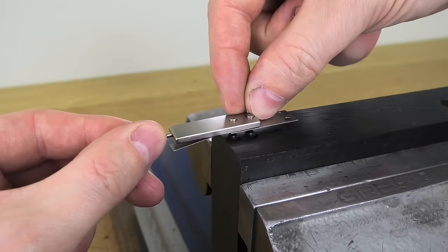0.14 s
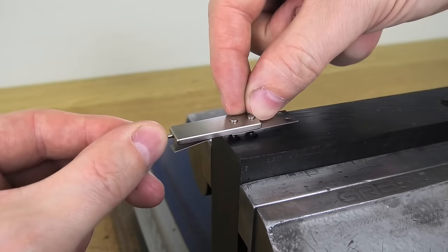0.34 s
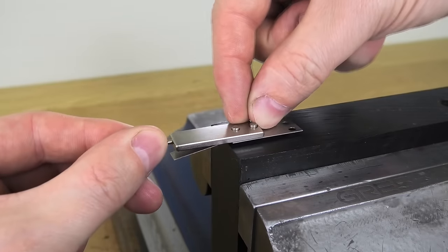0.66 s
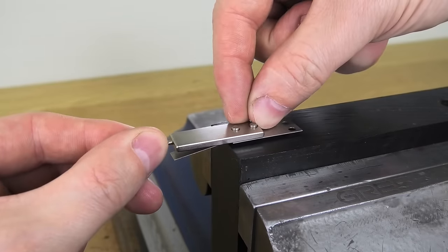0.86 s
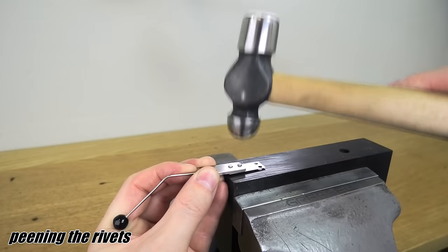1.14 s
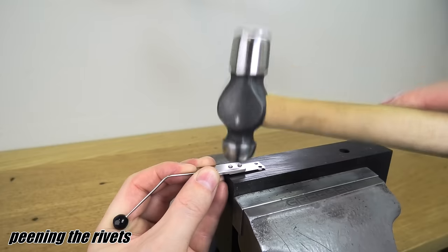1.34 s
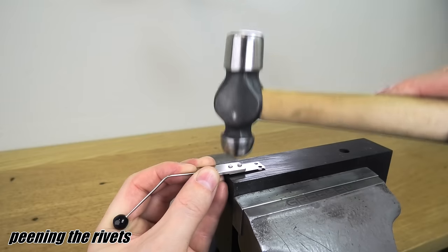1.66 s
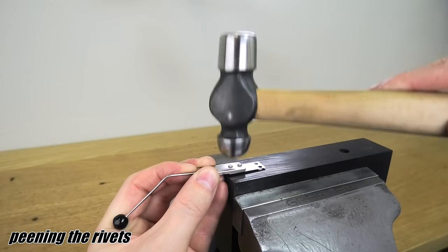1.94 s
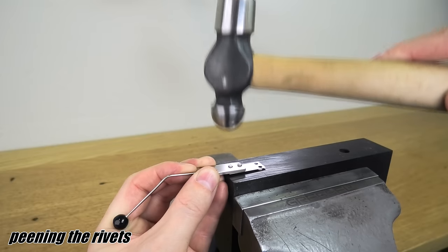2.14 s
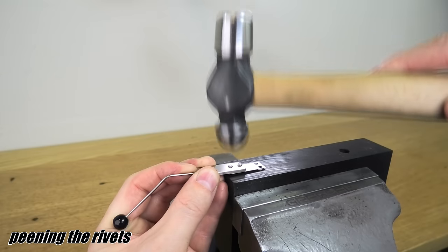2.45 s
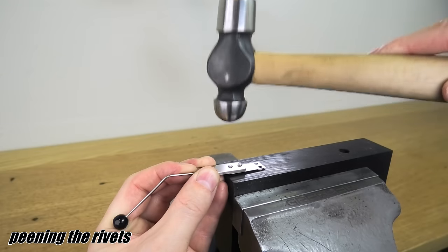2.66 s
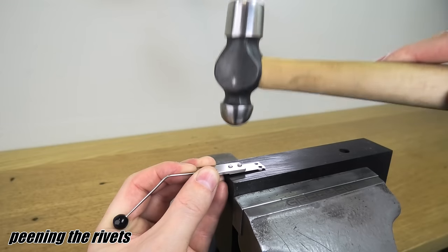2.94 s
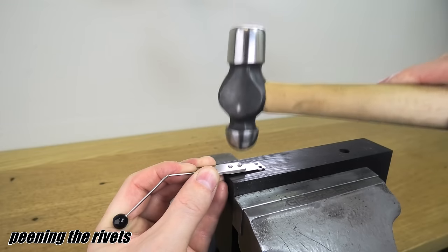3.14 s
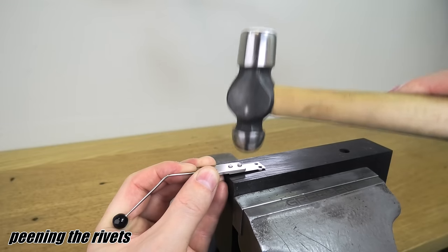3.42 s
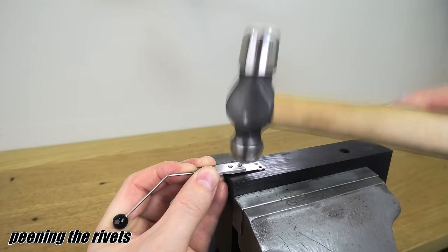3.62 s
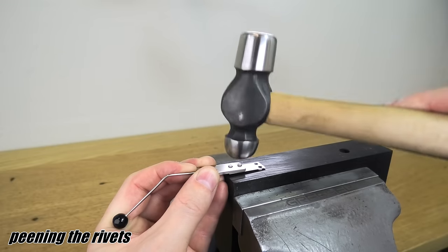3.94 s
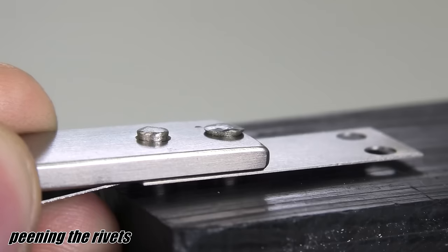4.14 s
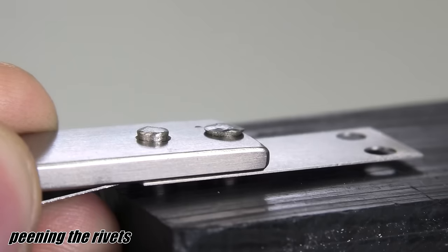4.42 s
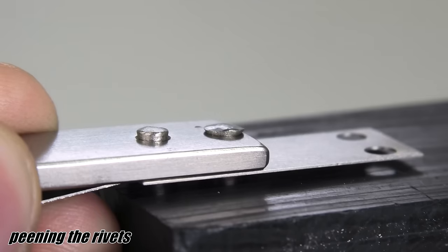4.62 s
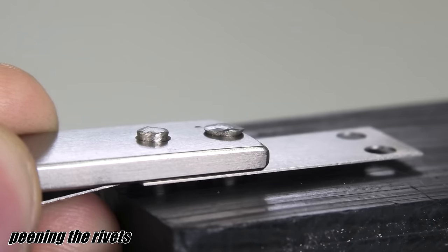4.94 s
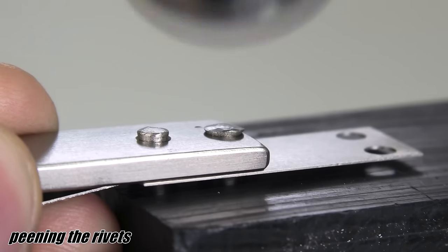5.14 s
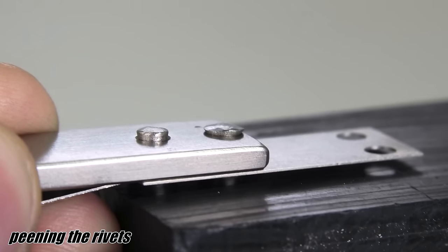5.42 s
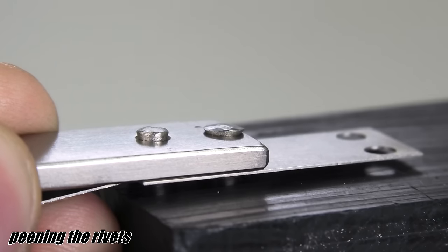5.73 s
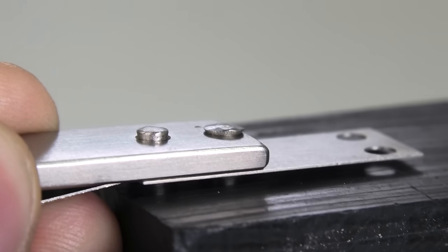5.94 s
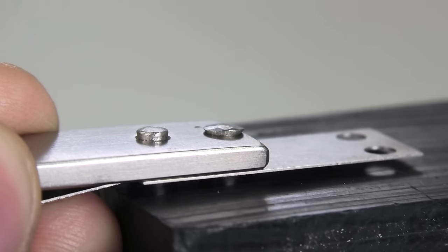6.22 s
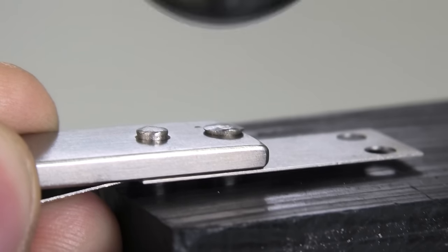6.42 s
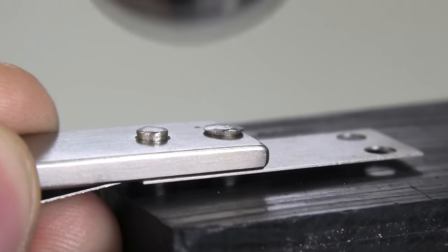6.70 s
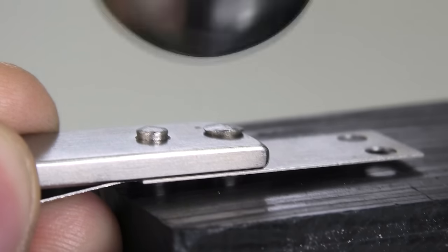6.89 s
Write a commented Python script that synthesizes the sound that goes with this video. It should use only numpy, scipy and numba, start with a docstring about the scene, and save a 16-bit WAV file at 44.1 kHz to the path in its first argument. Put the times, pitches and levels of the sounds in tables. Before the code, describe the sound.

A small hammer taps rivets over a steel vise in a quick, even rhythm, with ringing clanks and a rattling wooden bench.

```python
"""A faint hum and soft air noise fill a small workshop. Fingers snap a thin plate into place.
Then a small ball hammer taps rivets on the steel back of a bench vise, 22 times.
Each blow cracks, rings the hammer and vise, drums the wooden bench and rattles the tools on it.
The walls answer the plate and the bright steel; a limiter ducks loud peaks and recovers.
Midway through the taps the ringing dips briefly, and the later blows have a slightly different tone."""
import sys
import numpy as np
from scipy import signal
from scipy.fft import rfft, irfft, next_fast_len
from scipy.io import wavfile
from scipy.ndimage import map_coordinates
from numba import njit

SR = 44100
rng = np.random.default_rng(int(sys.argv[2]) if len(sys.argv) > 2 else 0)


def wrap_up_sound(samples):
    """Save the sound to the file named by the first command line argument, as 16-bit audio."""
    columns = np.atleast_2d(samples).T
    # keep every value between -1 and 1, then stretch to whole-number steps
    tamed = np.clip(columns, -1, 1)
    steps = np.round(tamed * 32767).astype(np.int16)
    wavfile.write(sys.argv[1], SR, steps)


N = 311346
T = np.arange(SR * 3 // 5) / SR  # the clock of one short sound [s]

# Tones of the hum: (pitch [Hz], average level [dB])
HUM_TONES = [(48.4, -65), (102.3, -66.5), (209.9, -80.5), (366.1, -77.5), (398.4, -83)]
# Colour of the air noise: (frequency [Hz], relative level [dB])
AIR_COLOUR = [(12, -38), (20, -5), (43, -9.5), (101, -1.5), (129, -10), (200, -11), (328, -20.5),
              (365, -14.5), (431, -16.5), (954, -28.5), (5820, -40.5), (7450, -42), (14000, -51)]
# Air noise over time: (time [s], level [dB], extra gain above 1 kHz [dB])
AIR_LEVELS = [(0, -69.5, 3), (.6, -65, -1), (1, -70.5, 4.5), (1.02, -63, -11.5), (7.06, -69.5, 2.5)]
# Plate snaps: (time [s], level [dB], knock level [dB], high ring [Hz], low ring [Hz],
# low ring against high [dB], scrape against snap [dB])
SNAPS = [(0.7034, -17.5, -32.5, 12200, 3970, -17.5, -15), (1.2944, -41.5, -54.5, 5600, 4320, 0, -28),
         (1.686, -51, -64, 4750, 3430, -6, -22)]
# Echo of the walls: (frequency [Hz], fade time [s]). A fade time is how long a 60 dB fall takes.
WALL_FADE = [(200, 1), (1000, 0.25), (4000, 0.25), (13000, 0.085)]
# Ringing tones of each part: (pitch [Hz], relative level [dB], fade time [s])
BENCH_TONES = [(29.24, -20, 0.93), (59.5, -13, 0.56), (91.7, -0.5, 0.31), (107.7, -13.5, 0.63),
               (144.5, -17, 0.7), (171.4, -8.5, 0.36), (201.1, -13, 0.5), (258.2, -5.5, 0.11),
               (281, -11, 0.25), (314, -17.5, 0.59), (354.9, -6, 0.36), (374.8, -1.5, 0.31),
               (392, -12.5, 0.3), (397.3, 1.5, 0.21), (388.7, -20.5, 0.14), (424.6, -12.5, 0.48),
               (471.5, -10.5, 0.12), (462.6, -21.5, 0.92), (508, -12.5, 0.29), (546, -3.5, 0.28),
               (553.7, -10.5, 0.4), (573, -16, 0.076), (611, -18, 0.083), (634, -5, 0.29),
               (664.8, -2, 0.31), (685, 0, 0.25), (694.7, -12.5, 0.24), (704, -6.5, 0.27),
               (735.6, -7, 0.22), (758, -21.5, 0.11)]
CLACK_TONES = [(902, 3.5, 0.019), (1260, -6, 0.058), (1740, -7, 0.0072)]  # the jolt of the vise body
JAW_TONES = [(840, -1, 0.073), (890.5, 4, 0.25), (925, 2, 0.31), (933, -7, 0.25), (1050, -14.5, 0.11),
             (1142, -11.5, 0.15), (1193, -15, 0.35), (1224, 4.5, 0.28), (1270, -14.5, 0.47),
             (1322, -11.5, .4), (1390, -16.5, 0.12), (1475, 3.5, .24), (1570, -12, 0.29),
             (1579, -0.5, 0.21), (1532, 6, 0.25), (1610, -1.5, 0.31), (1550, -10, 0.32), (1782, 0, 0.28),
             (1797, 0, 0.26), (1880, 0.5, 0.28), (1757, -11, 0.23), (1930, -24.5, 0.19),
             (2106, -14.5, 0.083), (2170, -23.5, 0.087), (2517, -8.5, 0.13)]
VISE_TONES = [(3020, -11.5, 0.25), (3067, -12, 0.29), (3093, -14, 0.3), (3160, -12.5, 0.2),
              (3127, 6.5, 0.1), (3226, -7, 0.14), (3580, -28.5, .08), (3990, -1.5, 0.053), (4280, -12, 0.1),
              (4428, -15.5, 0.19), (4445, -19, 0.25), (4906, -12.5, 0.066), (5028, -2, 0.038),
              (5700, -12.5, 0.027)]
HAMMER_TONES = [(12950, 0.5, 0.04), (15900, -14, 0.022), (9400, -17, 0.03), (11800, -12, 0.02),
                (7900, -13, 0.025), (6800, -21.5, 0.021)]
# Bench top panels, each swelling at its own speed; the 703 Hz knock comes first:
# (pitch [Hz], relative level [dB], fade time [s], swell [s])
PANEL_TONES = [(703.3, 15, 0.065, 0.012), (630.3, 2.5, 0.14, 0.049), (549.5, 6, 0.17, 0.058),
               (382, -2.5, 0.083, 0.032), (271, -0.5, 0.077, 0.02), (189, 0.5, 0.12, 0.074)]
# Hammer blows; the force is added to each level after it: (time [s], force [dB], bench knock [dB],
# vise body [dB], crack [dB], vise ring [dB], vise ping [dB], hammer ring [dB])
HAMMER_BLOWS = [(1.0982, -16.5, -1, -2.5, -8.5, -17, -19, -26), (1.399, -16, -2.5, 0, -3.5, -8.5, -19, -23),
                (1.695, -18, -3, 0, -2, -14.5, -16.5, -12), (1.9737, -17, -9, -1.2, -9, -10.5, -22, -12),
                (2.257, -16, -13, 1.3, -9.5, -14, -13, -13),
                (2.5446, -16.5, -10.5, -3.5, -7.5, -16.5, -26.5, -34.5),
                (2.8285, -15, -15, 0, -4, -14, -11.5, -32), (3.1118, -14.5, -7, 0.4, -6, -12, -20, -26),
                (3.3863, -13.5, -3.5, -1, -1, -14, -16, -30),
                (3.6829, -13.5, -2.5, -3.5, -4, -18.5, -19, -18),
                (3.9659, -15, -0.5, -1.5, -3, -14, -19.5, -21.5),
                (4.2709, -19, -2.5, -1, -4.5, -20, -29, -25), (4.5538, -15, -5, 0.3, -2, -16.5, -15.5, -28),
                (4.821, -13.5, -3, 1.5, 0.5, -16, -14.5, -27.5),
                (5.0966, -14, -1.2, -1, -6.5, -24, -23.5, -27), (5.385, -13, -4.5, 1, -3, -7, -11, -38),
                (5.6478, -12, -2, 2, -6.5, -13, -19.5, -33), (5.907, -13, -2, 5, 5, -9.5, -6.5, -19),
                (6.157, -11.5, -1, 1.5, -6.5, -14, -35, -28), (6.4208, -12.5, -3, 4, -1, -16, -6.5, -22),
                (6.6675, -13, -1, 0.6, -4.5, -20, -31, -33), (6.9243, -12, -3.5, 2.7, -6, -17.5, -23, -35)]
# Tone of the early blows, then the late ones: (bench legs [dB], low panels [dB], clack [dB], jaw [dB],
# treble tilt of clack and jaw [dB per octave], extra crack above 12 kHz [dB])
BLOW_TONE = [(-9, -10, 0.33, -8, 0, 1.5), (-9.5, -13, -1.2, -7, 3, -6.5)]
# Colours of the crack and of the rattling tools: (frequency [Hz], relative level [dB])
CRACK_COLOUR = [(1180, -29.5), (2000, -1), (4710, -17), (8820, -4.5), (10200, -7), (12900, -11.5),
                (13800, -12.5), (15600, -7.5), (16500, -25.5)]
RATTLE_COLOUR = [(80, -31.5), (200, 1.5), (500, 1.5), (850, -2.5), (1020, -3.5), (2100, -11.5),
                 (2660, -26.5), (3140, -16), (4510, -22), (5720, -30), (6170, -28), (9570, -32.5),
                 (14800, -40.5), (16000, -62.5)]
# How the rattle dies away: (frequency [Hz], fade time [s])
RATTLE_FADE = [(200, 0.42), (800, 0.27), (2000, 0.3), (5000, 0.27), (13000, 0.22)]

TIGHT_DB, LOOSE_DB, PARTS_DB = 1.2, 2.5, 5.5  # how much a tone's strength varies from hit to hit
CHANGE_S, DIP_DB = 4.174, -12  # when the ringing dips and the late tone begins; depth of the dip


def amp(db):
    """Turn decibels into a gain."""
    return 10 ** (np.asarray(db) / 20)


def along(points, hz):
    """Read between (frequency, value) points on a log axis."""
    frequencies, values = np.transpose(points)
    return np.interp(np.log(hz + 1), np.log(frequencies + 1), values)


def filtered(x, response):
    """Scale each frequency of x by response(hz)."""
    size = next_fast_len(x.shape[-1] + 8192)
    return irfft(rfft(x, size) * response(np.fft.rfftfreq(size, 1 / SR)), size)[..., :x.shape[-1]]


def noise(colour, length):
    """Coloured noise with an average power of 1."""
    x = filtered(rng.standard_normal(length), lambda hz: amp(along(colour, hz)))
    return x / np.sqrt(np.mean(x ** 2) + 1e-20)


def burst(colour, fade_s):
    """A short puff of noise."""
    return amp(-60 * T / fade_s) * noise(colour, len(T))


def tones(table, rise_s):
    """One fading tone per row; neighbours swing opposite ways, and a big body takes a moment to fill."""
    hz, db, fade_s = np.transpose(table)[:, :, None]
    sign = (-1.) ** np.arange(len(table))[:, None]
    swell = (1 - np.exp(-T / rise_s)) ** 2
    return sign * amp(db - 60 * T / fade_s) * np.sin(2 * np.pi * hz * T) * swell


def struck(rows, spread_db):
    """One hit: mix the tones at random strengths, with a peak near 1."""
    ring = amp(spread_db * rng.standard_normal(len(rows))) @ rows
    return ring / np.abs(rows.sum(0)).max()


def fading(colour, fade, rise_s):
    """Dense ringing in which each frequency dies at its own speed."""
    hz, t, bands = signal.stft(rng.standard_normal(len(T)), SR, nperseg=256)
    bands *= amp(along(colour, hz)[:, None] - 60 * t / along(fade, hz)[:, None])
    tail = signal.istft(bands, SR, nperseg=256)[1][:len(T)] * (1 - np.exp(-T / rise_s))
    return tail / np.abs(tail).max()


def add(track, time, sound):
    """Mix a sound in at a time in seconds."""
    track[round(time * SR):][:len(sound)] += sound


def hum_and_air():
    """A wavering hum under soft air noise."""
    t = np.arange(N) / SR
    times, *levels = np.transpose(AIR_LEVELS)
    air_db, hiss_db = [np.interp(t, times, db) for db in levels]
    air = noise(AIR_COLOUR, N)
    hiss = filtered(air, lambda hz: hz > 1000)
    waver = lambda: map_coordinates(rng.standard_normal(int(t[-1] * 8) + 4), [t * 8])  # 8 values a second
    hum = sum(amp(db + 3.2 * waver()) * np.sqrt(2) * np.sin(2 * np.pi * hz * t + 0.99 * waver())
              for hz, db in HUM_TONES)
    return amp(air_db) * (air - hiss + amp(hiss_db) * hiss) + hum


def plate():
    """A scrape swells into a bright snap of thin metal, which knocks faintly in the bench."""
    track, bench = np.zeros(N + SR), tones(BENCH_TONES, rise_s=0.0019)
    for time, db, knock_db, high_hz, low_hz, low_db, scrape_db in SNAPS:
        snap = tones([(high_hz, 0, .0025), (low_hz, low_db, .004)], rise_s=0.0001).sum(0)
        scrape = amp(scrape_db) * burst([(500, -5.5), (3000, -12.5), (16000, -8.5)], fade_s=0.018)
        knock = struck(bench, LOOSE_DB) * amp(-200 * T)
        knock = filtered(knock, lambda hz: 1 / (1 + (hz / 200) ** 2))  # keep the bass
        add(track, time, amp(db) * (snap / np.abs(snap).max() + scrape) + amp(knock_db) * knock)
        add(track, time - .02, amp(db) * scrape[:SR // 50][::-1])  # backwards, so it swells
    return walls(track[:N], echo_db=-10)


def walls(x, echo_db):
    """The sound plus the walls' scattered, duller answer."""
    tail = fading([(500, 5.5), (4000, -1), (13000, -5)], WALL_FADE, rise_s=0.0088)
    return x + amp(echo_db) * signal.fftconvolve(x, tail / np.linalg.norm(tail))[:N]


def bench_drum(legs_db, knock_db, low_db):
    """The wooden bench booms, its legs thump and its top panels knock."""
    bench = tones(BENCH_TONES, rise_s=0.01)
    legs = np.array(BENCH_TONES)[:, 0] < 130
    panels, swell_s = np.split(np.array(PANEL_TONES), [3], axis=1)
    knock = tones(panels, swell_s)
    low = panels[:, 0] < 300
    boom = struck(bench[~legs], TIGHT_DB) + amp(legs_db) * struck(bench[legs], TIGHT_DB)
    boom += amp(knock_db) * struck(knock[~low], TIGHT_DB)
    return boom + amp(low_db) * struck(knock[low], TIGHT_DB)


def vise_body(clack_db, jaw_db, tilt_db):
    """The vise jolts with a clack and its jaw rings."""
    body = amp(clack_db) * struck(tones(CLACK_TONES, rise_s=.0001), TIGHT_DB)
    body += amp(jaw_db) * struck(tones(JAW_TONES, rise_s=.001), LOOSE_DB)
    return filtered(body, lambda hz: amp(tilt_db * np.log2(np.clip(hz / 1300, .5, 2))))


def small_parts(count):
    """Small steel parts ring at random pitches, fading a little sooner than the rattle."""
    hz = np.exp(rng.uniform(np.log(1900), np.log(12000), count))
    table = np.transpose([hz, along(RATTLE_COLOUR, hz), 0.79 * along(RATTLE_FADE, hz)])
    return tones(table, rise_s=0.0012)


def tool_rattle(same_rattle, parts):
    """Tools and small parts shake on the bench, partly alike on each blow and partly new."""
    rattle = same_rattle + 0.68 * fading(RATTLE_COLOUR, RATTLE_FADE, rise_s=0.001)
    return amp(-0.5) * rattle + amp(-18) * struck(parts, PARTS_DB)


def steel_clink(ring_db, head_db, ping_db):
    """The vise and the hammer head ring; the vise's highest tones make a quick ping."""
    high = np.array(VISE_TONES)[:, 0] > 4700
    vise = tones(VISE_TONES, rise_s=np.where(high, .002, .007)[:, None])
    clink = amp(ring_db) * struck(vise[~high], LOOSE_DB)
    clink += amp(head_db) * struck(tones(HAMMER_TONES, rise_s=0.00057), TIGHT_DB)
    return clink + amp(ping_db) * struck(vise[high], LOOSE_DB)


def crack(edge_db):
    """Steel meets steel: a sharp burst with a softer tail."""
    colour = [(hz, db + edge_db * (hz > 12000)) for hz, db in CRACK_COLOUR]
    return burst(colour, fade_s=0.0026) + 0.23 * burst(colour, fade_s=0.03)


def hammer():
    """The bench answers each blow nearly alike; the spot hit sets the knock, crack and steel rings."""
    thuds, clinks = np.zeros((2, N + SR))
    same_rattle = fading(RATTLE_COLOUR, RATTLE_FADE, rise_s=0.00029)
    parts = small_parts(count=70)
    # air squeezed out at contact
    puff = amp(-0.5) * T / 0.00038 * np.exp(1 - T / 0.000099) * (1 - T / 0.00055)
    for time, force_db, knock_db, body_db, crack_db, ring_db, ping_db, head_db in HAMMER_BLOWS:
        legs_db, low_db, clack_db, jaw_db, tilt_db, edge_db = BLOW_TONE[time > CHANGE_S]
        wood = bench_drum(legs_db, knock_db, low_db)
        body = vise_body(clack_db, jaw_db, tilt_db) + tool_rattle(same_rattle, parts)
        add(thuds, time, amp(force_db) * (wood + puff + amp(body_db) * body))
        clink = steel_clink(ring_db, head_db, ping_db) + amp(crack_db) * crack(edge_db)
        add(clinks, time, amp(force_db) * clink)
    return (thuds[:N] + walls(clinks[:N], echo_db=-11)) * level_dip()


def level_dip():
    """A gain that drops over 10 ms and stays low until the next blow."""
    t = np.arange(N) / SR
    next_blow = min(time for time, *_ in HAMMER_BLOWS if time > CHANGE_S)
    drop = np.clip((t - CHANGE_S) / .01 + .5, 0, 1)
    return amp(DIP_DB * drop * (t < next_blow))


def scene():
    """All the sounds in one channel."""
    return (hammer() + plate() + hum_and_air())[None]


@njit
def limiter(level, ceiling, recovery_s):
    """A gain that drops at once to hold a peak at the ceiling, then creeps back."""
    gains, gain = np.empty(len(level)), 1.
    for i in range(len(level)):
        gain = min(gain + (1 - gain) / (recovery_s * SR), ceiling / (level[i] + 1e-9))
        gains[i] = gain
    return gains


def record(dry):
    """Hold down the peaks, then cut the very highest treble."""
    gain = limiter(np.abs(dry[0]), ceiling=amp(-14.5), recovery_s=.12)
    return filtered(dry * gain, lambda hz: np.clip((16800 - hz) / 1300, 0, 1) ** 3)


dry = scene()
out = record(dry)
wrap_up_sound(out)
```